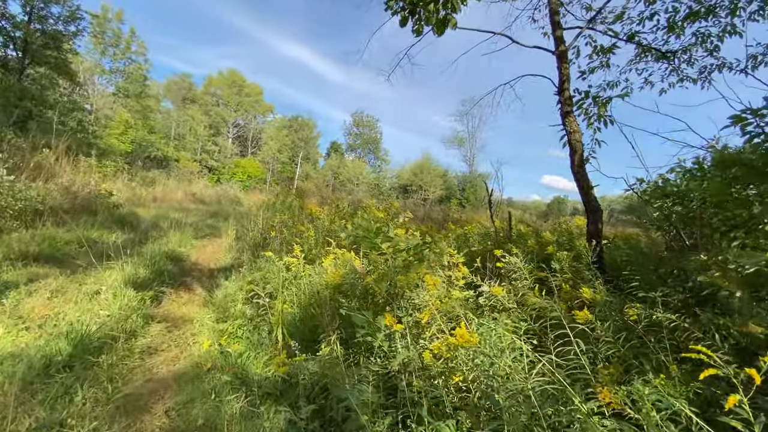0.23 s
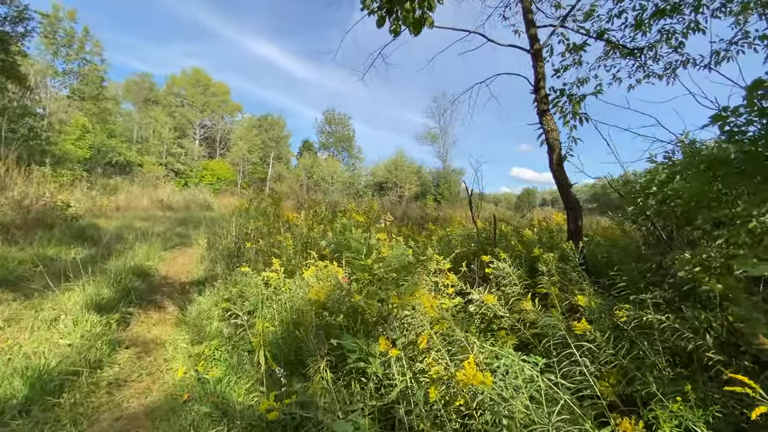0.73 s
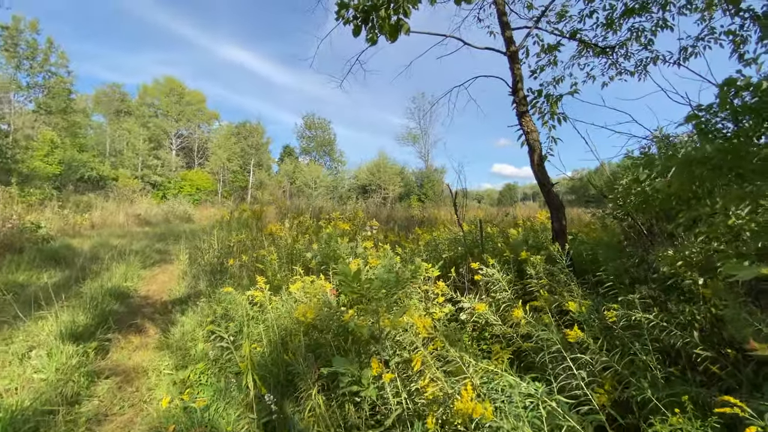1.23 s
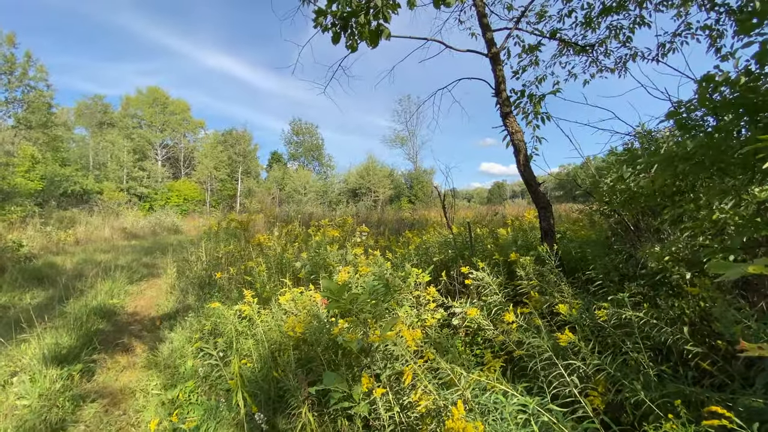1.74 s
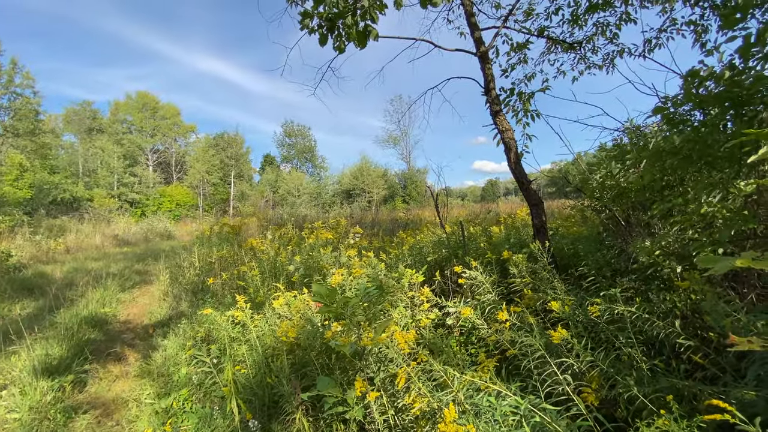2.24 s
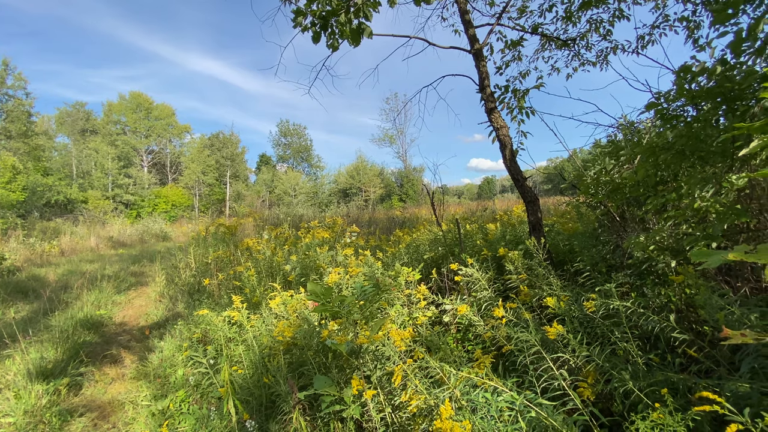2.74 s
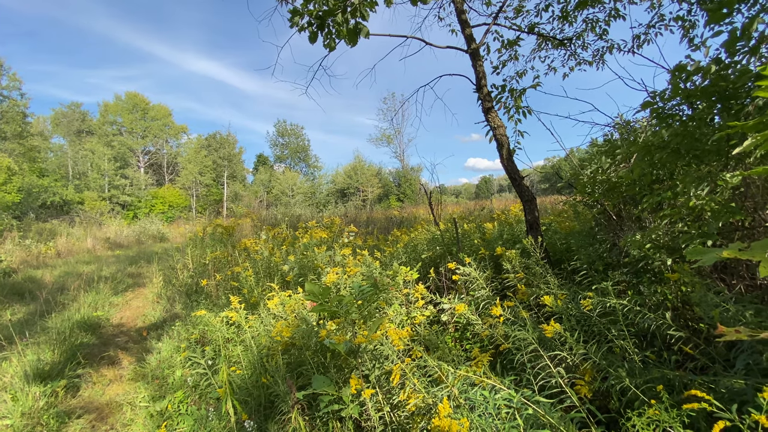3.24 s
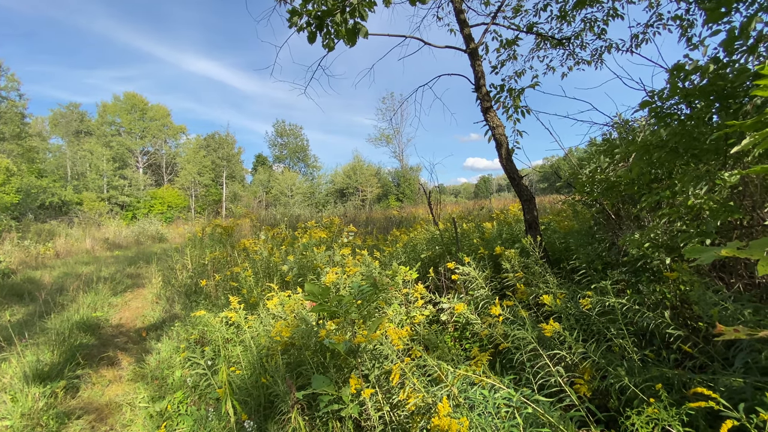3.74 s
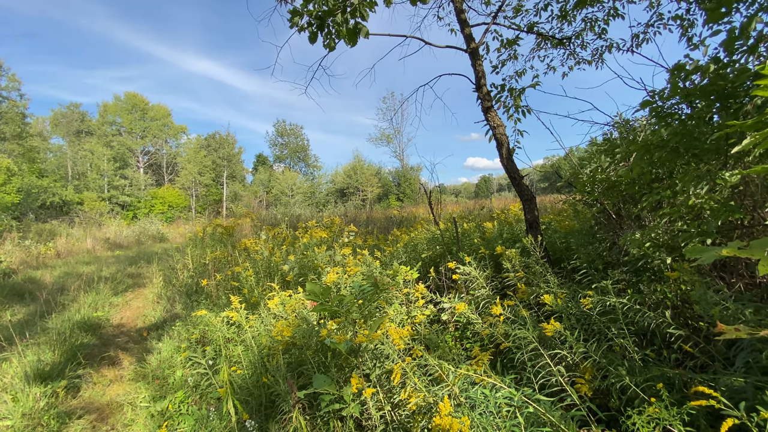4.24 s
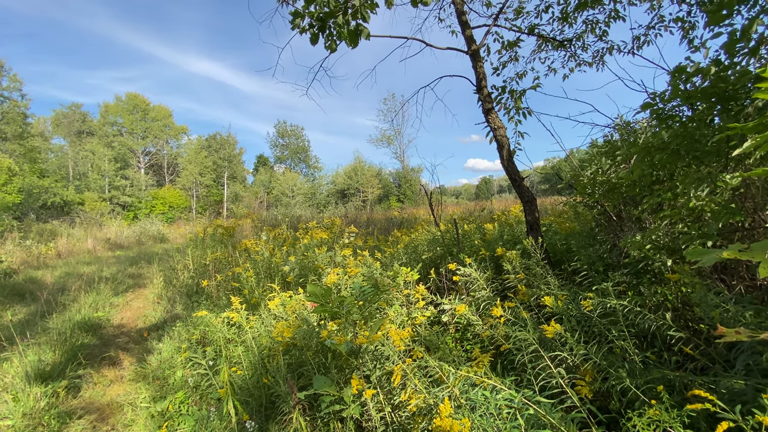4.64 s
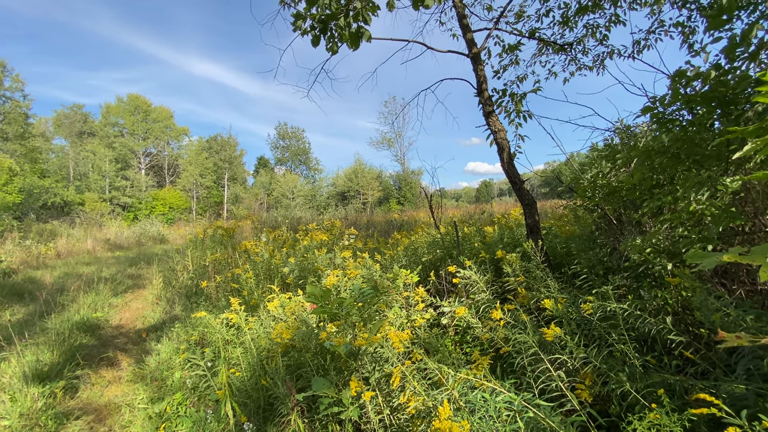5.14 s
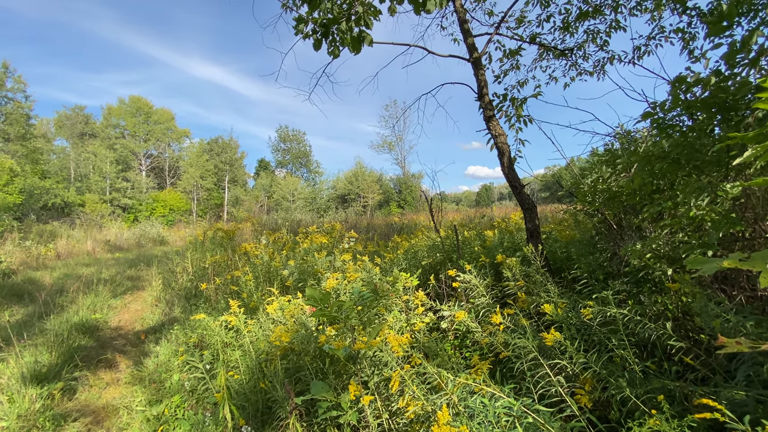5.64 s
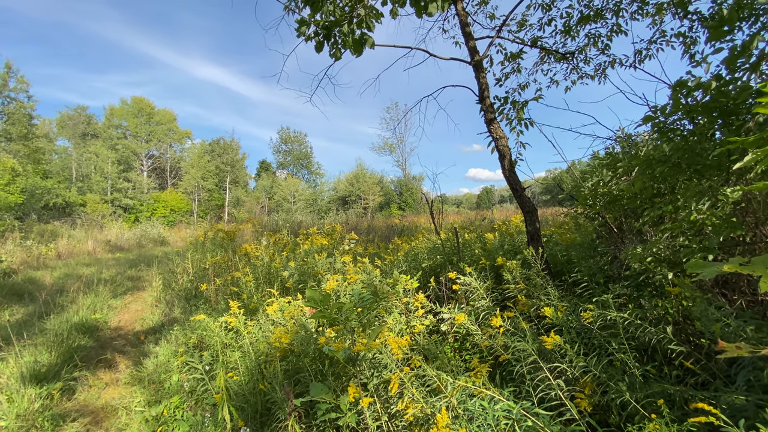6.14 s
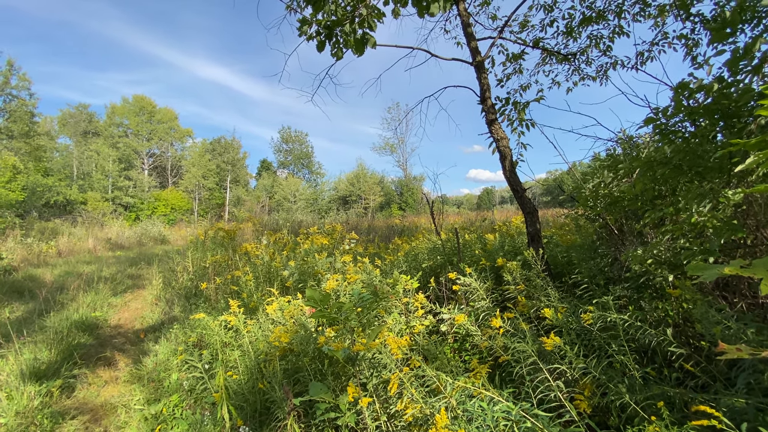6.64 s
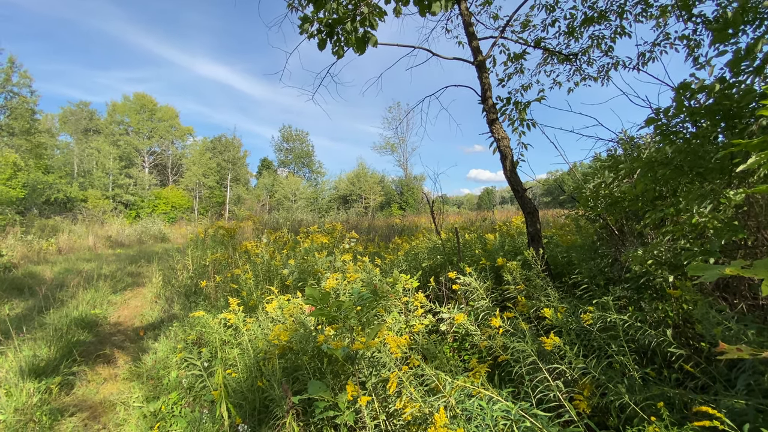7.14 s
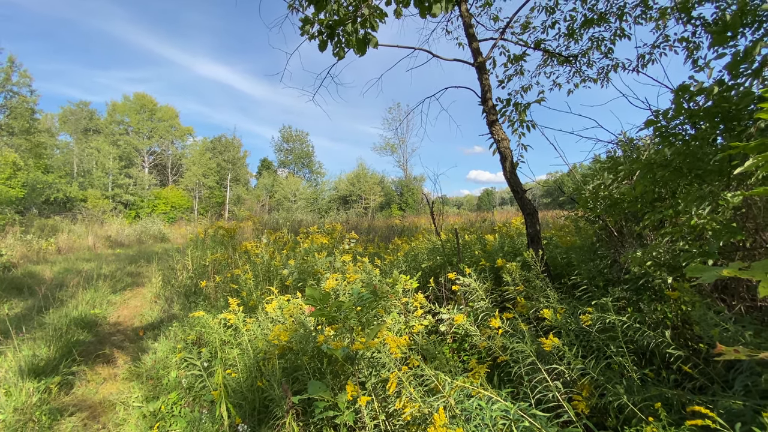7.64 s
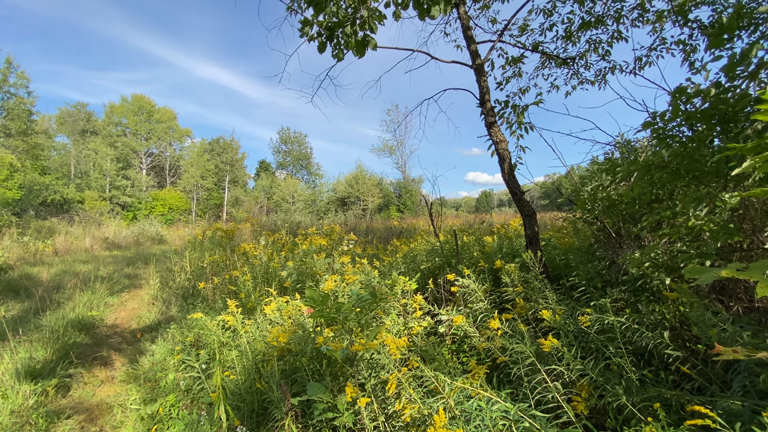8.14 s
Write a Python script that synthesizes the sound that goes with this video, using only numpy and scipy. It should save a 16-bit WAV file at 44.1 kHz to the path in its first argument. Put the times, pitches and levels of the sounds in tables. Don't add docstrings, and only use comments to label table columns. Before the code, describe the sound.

Katydids rasp about ten times a second over trilling crickets in a sunny meadow, with cloth rustle, small ticks and a soft wind rumble early on.

```python
import sys
import numpy as np
from scipy import signal
from scipy.fft import rfft, irfft
from scipy.io import wavfile
from scipy.ndimage import uniform_filter1d

SR = 44100
rng = np.random.default_rng(int(sys.argv[2]) if len(sys.argv) > 2 else 0)


def linear_from_db(decibels):
    return 10 ** (np.asarray(decibels, float) / 20)


def store_pcm(level_fs):
    pcm = np.round(np.clip(level_fs, -1, 1) * 32767).astype(np.int16)
    wavfile.write(sys.argv[1], SR, np.atleast_2d(pcm).T)


N = 369999
TIME = np.arange(N) / SR


def evened(x):
    return x / np.sqrt(np.mean(x ** 2) + 1e-20)


def read(points, hz):
    f, value = np.transpose(points)
    return np.interp(np.log(hz + 1), np.log(f + 1), value, left=-120, right=-120)


def curve(rows):
    return np.interp(TIME, *np.transpose(rows))


def sides(pan_db):
    return linear_from_db(np.array([pan_db / 2, -pan_db / 2]))


def add(mix, s, sound):
    part = mix[:, max(round(s * SR), 0):][:, :sound.shape[1]]
    part += sound[:, :part.shape[1]]


def colour(x, gains):
    return irfft(rfft(x) * gains, N)


def hiss(shape, same, patchy_db, size=1024):
    hop, hz = size // 4, np.fft.rfftfreq(size, 1 / SR)
    a, b, c, d, patches = rng.standard_normal((N // hop + 5, len(hz), 5)).T
    patches = uniform_filter1d(patches, size=8, axis=0)
    patches = evened(uniform_filter1d(patches, size=12, axis=1))
    same = np.clip(same, -1, 1)
    left = a + 1j * b
    right = same * left + np.sqrt(1 - same ** 2) * (c + 1j * d)
    z = np.array([left, right]) * linear_from_db(read(shape, hz)[:, None] + patchy_db * patches)
    return evened(signal.istft(z, nperseg=size, noverlap=size - hop)[1][:, :N])


# t/s, lateness/ms, level/dB
LEADER = [(0.0, -15, -50.2), (0.35, -13.8, -45.3), (1.1, -7, -45.5), (1.5, -9, -43), (1.75, -13.0, -44.5),
          (2.2, -5, -45), (3.0, -10, -44), (3.5, -23, -44.6), (3.9, -15, -44.5), (4.6, -13.7, -44.5),
          (5.2, -16.8, -44.6), (5.7, -13, -45), (6.2, -15.0, -45.0), (6.6, 10.9, -48.1), (7.0, -9.5, -47),
          (7.5, -18.5, -48.5), (8.0, -30.8, -51), (8.4, 20.0, -50)]
# first stroke t/s, last stroke t/s, period/ms, first level/dB, last level/dB
BOUTS = [
    (.0321, 1.041, 100.9, -43.4, -48.6),
    (1.4772, 3.588, 100.5, -56.6, -54.9),
    (3.654, 6.153, 99.95, -55.7, -52.8),
    (6.2894, 6.906, 102.8, -47.7, -50.2),
    (7.4493, 8.386, 104.0, -46.3, -45.7),
]


def wing_strokes():
    first_s, period_s = .048, .1044
    beat = np.arange(first_s, N / SR + .05, period_s)
    s, late_ms, db = np.transpose(LEADER)
    rows = list(zip(beat + np.interp(beat, s, late_ms) / 1000, np.interp(beat, s, db)))
    for first, last, period_ms, first_db, last_db in BOUTS:
        count = round((last - first) / period_ms * 1000) + 1
        times = first + np.arange(count) * period_ms / 1000
        rows += zip(times, np.linspace(first_db, last_db, count))
    return rows


def strokes(rows, shift_s, rise_s, fall_s):
    power, u = np.zeros((1, N)), np.arange(-.08, .05, 1 / SR)
    stop_sharpness = 2.8
    shape = np.exp(-np.where(u < 0, (u / rise_s) ** 2, abs(u / fall_s) ** stop_sharpness))[None]
    for s, db in rows:
        start_s = s + shift_s - .08
        missed = max(round(-start_s * SR), 0)
        add(power, start_s, linear_from_db(2 * db) * shape[:, missed:])
    return power[0]


# from t/s, to t/s
PAUSES = [
    (1.1, 1.42),
    (6.95, 7.45),
]


def murmur():
    murmur_db, pause_db, ramp_s = -59, -5.5, 0.025
    resting = sum(np.clip(np.minimum(TIME - a, b - TIME) / ramp_s, 0, 1) for a, b in PAUSES)
    return linear_from_db(2 * (murmur_db + pause_db * resting))


# f/Hz, level/dB
RASP = [(8600, -45), (9200, -17.5), (10000, -8), (11000, -1.5), (12000, -1.5), (13000, 2), (14000, -3.5),
        (15000, -6.5), (16000, -9.5), (16300, -39)]
# f/Hz, left-right level/dB
RASP_PAN = [(8500, 1.5), (9800, -4), (10800, -5.5), (11800, 0.5), (13000, -4), (16000, 7)]


def katydids():
    hz = np.fft.rfftfreq(N, 1 / SR)
    tooth_gain = linear_from_db(1.2 * np.minimum(rng.exponential(1, (3, N)), 3.0))
    struck = rng.random((3, N)) < 2000 / SR
    teeth = tooth_gain * struck * rng.choice([-1, 1], (3, N))
    rush = evened(evened(teeth) + 1.5 * rng.standard_normal((3, N)))

    rows, blur = wing_strokes(), murmur()
    late = np.sqrt(strokes(rows, shift_s=0.0085, rise_s=0.017, fall_s=0.021) + blur)
    early = np.sqrt(strokes(rows, shift_s=-0.001, rise_s=0.016, fall_s=0.017) + linear_from_db(-1.0) * blur)
    low_share = 1 / (1 + (hz / 12000) ** 12)
    sound = rfft(rush * late) * np.sqrt(low_share) + rfft(rush * early) * np.sqrt(1 - low_share)

    same = np.clip(np.interp(hz, [9500, 10200, 11000, 16000], [.05, .6, 0.86, .8]), 0, 1)
    lead = np.exp(2j * np.pi * (hz - 11150) / 4400)
    shared = np.sqrt(same) * sound[0]
    own = np.sqrt(1 - same) * sound[1:]
    ports = np.array([shared + own[0], shared * lead + own[1]])
    gain = linear_from_db(read(RASP, hz))
    pan = sides(np.interp(hz, *np.transpose(RASP_PAN)))
    return linear_from_db(-1.0) * irfft(ports * gain * pan, N) / np.sqrt(np.mean(gain ** 2))


def chirp(s, db, hz, growth_db, gap_ms, pan_db):
    first_gap_s, middle_db, rise_hz = .0445, 1.5, 35
    out, t = np.zeros((2, SR // 5)), np.arange(0, .016, 1 / SR)
    for step, at in ((-1, 0), (0, first_gap_s), (1, first_gap_s + gap_ms / 1000)):
        pitch, phase = hz + step * rise_hz, rng.random((2, 1))
        cycles = pitch * t * (1 - 0.42 * t) + phase
        pulse = signal.windows.tukey(len(t), .5) * np.sin(2 * np.pi * cycles)
        level = linear_from_db(db + step * growth_db + middle_db * (step == 0))
        add(out, at, level * sides(pan_db)[:, None] * pulse)
    return s - first_gap_s - .002, out


# middle pulse t/s, level/dB, f/Hz, growth per pulse/dB, last gap/ms
CHIRPS = [(.164, -46, 4860, 5, 44), (.9207, -44.5, 4860, -0.5, 50), (1.4544, -41, 4820, -1, 47),
          (1.888, -46.5, 4850, 2, 51), (2.4279, -48, 4800, 3, 52), (2.9317, -45, 4830, 0, 44),
          (3.412, -46.5, 4800, 4, 51), (3.7594, -46, 4850, -1, 55), (4.2153, -48.5, 4810, .4, 47),
          (4.6683, -45.5, 4870, 3.5, 52), (5.0674, -45.5, 4870, 4, 49), (5.4779, -46, 4890, 2.5, 52),
          (5.9469, -47.5, 4830, 4, 48), (6.4812, -46, 4800, 0.3, 48), (6.9443, -47, 4850, 4, 48),
          (7.425, -44.5, 4850, 1, 49), (7.9758, -45.5, 4854, 0.5, 58)]
# middle pulse t/s, level/dB
ANSWERS = [(.041, -52), (.505, -56.5), (1.055, -57), (1.496, -53.5), (2.015, -55), (2.468, -52.5),
           (2.917, -54), (3.454, -56), (3.85, -54), (4.399, -53.5), (4.843, -52), (5.294, -50),
           (5.836, -50), (6.262, -50), (6.696, -52.5), (7.153, -51), (7.634, -53), (8.076, -52)]


def field_crickets():
    out = np.zeros((2, N))
    for s, db, hz, growth_db, gap_ms in CHIRPS:
        add(out, *chirp(s, db + 1.4, hz, growth_db, gap_ms, pan_db=6.0))
    for s, db in ANSWERS:
        add(out, *chirp(s, db + 1.5, hz=5114, growth_db=0.3, gap_ms=47.5, pan_db=3.0))
    return out


def trill(hz, db, pan_db, share, rate, lead, glide=0.033, uneven_db=0.4, slip=.3):
    turns = rate * TIME + lead + .5
    count = np.floor(turns).astype(int) + 2
    step, loud = rng.standard_normal((700, 2, 2)).T
    phase = np.cumsum(slip * step, axis=1) + rng.random((2, 1))
    u = np.clip((turns % 1 - .5) / share, -.5, .5)
    cycles = hz * (TIME - glide * u ** 2 / 2 * share / rate) + phase[:, count]
    envelope = np.cos(np.pi * u) ** 2 * linear_from_db(uneven_db * loud[:, count])
    return linear_from_db(db) * sides(pan_db)[:, None] * evened(envelope * np.sin(2 * np.pi * cycles))


# wing f/Hz, level/dB, left-right level/dB, sounding share 0-1
TRILLS = [(3250, -72, 4.5, .5), (3500, -63, -4, 0.65), (3672, -65, 0.5, .6), (6674, -69, 4, 0.6),
          (7240, -69, 2, 0.7), (8207, -69.5, 1, 0.9), (5884, -72.5, -1.5, 0.75), (7640, -76, 3, 0.1),
          (7940, -74.5, 0.5, 0.5), (4895, -63, -3, 0.8), (4320, -70, -1.5, .6), (3955, -69.5, 10, 0.5)]
# pulse rate/Hz, lead/turns
BEATS = [(40.0, .14), (42.18, .45), (46.68, -.55), (41.36, .03), (49.02, .48), (54.0, -.55), (32.32, .1),
         (18.13, .45), (14.15, .05), (61.82, .33), (66.0, .2), (58.9, .1)]
# t/s, lead/turns
TREE_DRIFT = [(0, -0.15), (1.25, 0.21), (2.75, 0.43), (3.25, 0.26), (4.5, 0.15), (6, 0.15), (8.4, 0.37)]


def trillers():
    nearest = trill(3355, -62.0, 12.7, 0.61, rate=40.86, lead=curve(TREE_DRIFT), slip=0.2988)
    steady = sum(trill(*voice, *beat) for voice, beat in zip(TRILLS, BEATS))

    swell_db = np.max([db - 70 * abs(TIME - s - .03) for s, db in ANSWERS], axis=0) - 4
    voices = ((4984, 21.0, -0.7), (5085, 23.0, -5.0), (5170, 18.5, -7.5))  # f/Hz, pulse rate/Hz, level/dB
    further = sum(trill(hz, swell_db + db, 3, 0.47, rate, 0.19, slip=0.49, uneven_db=3.0)
                  for hz, rate, db in voices)

    fade_s = 0.7
    passed = np.exp(-TIME / fade_s) * trill(6790, -60, 3.8, 0.43, *BEATS[3])
    return nearest + further + steady + passed


def grass(x, t60_s, wet_db):
    t = np.arange(6000) / SR
    tail = rng.standard_normal((2, len(t))) * linear_from_db(-60 * t / t60_s) * (t > .002)
    return x + linear_from_db(wet_db) * signal.fftconvolve(x, tail / np.linalg.norm(tail[0]), axes=1)[:, :N]


# f/Hz, level/(dB per Hz)
CROWD = [(2950, -57), (3050, -33), (3150, -12.5), (3300, -4.5), (3550, -5), (4140, -11.5), (4800, -2),
         (5250, -5), (5650, -11.5), (6200, -16), (6650, -10.5), (8250, -14), (8450, -29), (8700, -50)]
# f/Hz, left-right level/dB
CROWD_PAN = [(3000, 1.5), (4100, 1), (5000, 8.5), (5600, 5.5), (7000, 8.5), (8000, 5), (9000, 4)]


def crowd():
    hz = np.fft.rfftfreq(N, 1 / SR)
    shimmer = hiss(CROWD, same=0.033, patchy_db=1.0, size=512)
    return linear_from_db(-53.5) * colour(shimmer, sides(np.interp(hz, *np.transpose(CROWD_PAN))))


# f/Hz, level/(dB per Hz)
FAR_RASP = [(8700, -42), (8950, -5.5), (9300, -1.5), (9800, -1), (10400, -6.5), (11200, -33)]


def far_katydids():
    return linear_from_db(-68.5) * sides(-1.6)[:, None] * hiss(FAR_RASP, same=0.16, patchy_db=2.5, size=512)


# t/s, peak level/dB, f/Hz, overtone f/Hz, left-right level/dB
TICKS = [(0.054, -43, 607, 1790, -2), (0.303, -54, 1630, 2170, -10), (0.348, -50.5, 910, 1850, -6),
         (0.46, -65, 1190, 1760, 1.0), (0.819, -58, 624, 1820, -3.0), (0.892, -62, 638, 1790, -5),
         (0.929, -61, 1040, 2750, -6), (1.004, -49, 1330, 2050, -9), (1.167, -51, 1020, 1850, 5),
         (1.212, -60, 640, 2620, 3), (1.268, -73, 638, 2570, 0.0), (6.192, -69, 705, 2750, 3),
         (7.726, -61, 700, 2060, -2.5), (8.364, -62, 910, 1910, 18)]


def ticks():
    out, t = np.zeros((2, N)), np.arange(0, .02, 1 / SR)
    for s, db, hz, overtone_hz, pan_db in TICKS:
        ring = np.sin(2 * np.pi * hz * t) + 0.45 * np.sin(2 * np.pi * overtone_hz * t)
        decay = linear_from_db(db + 1.5 - 60 * t / 0.012)
        add(out, s, decay * sides(pan_db)[:, None] * ring * np.minimum(t / .001, 1))
    return out


# t/s, level/dB
CLOTH = [
    [(0.0, -63.5), (0.188, -71), (0.326, -68), (0.456, -73.5), (1.178, -79), (1.45, -88.5)],
    [(7.6, -88), (8.354, -85), (8.378, -65.5), (8.39, -79)],
]
# f/Hz, level/(dB per Hz)
CLOTH_TONE = [(240, -26), (400, -1.5), (847, -7.5), (1060, -3), (2230, -12.5), (2850, -12), (3000, -15),
              (3900, -54), (6600, -120)]


def cloth():
    return linear_from_db(curve(np.vstack(CLOTH)) + 2.0) * hiss(CLOTH_TONE, same=0.16, patchy_db=3.0, size=256)


# t/s, level/dB
GUST = [(0, -71), (.2, -70.5), (.4, -60.5), (.82, -56.5), (1.0, -62.5), (1.2, -73), (1.5, -72),
        (3.5, -70.5), (3.92, -74.5), (4.66, -73.5), (5.05, -68), (5.42, -78), (5.85, -68), (6.14, -65.5),
        (6.5, -67), (6.88, -63), (7.2, -69), (8.39, -73)]
# f/Hz, level/(dB per Hz)
RUMBLE = [(15, -49), (25, -28), (40, -11), (55, -4.5), (75, 0.5), (114, -6), (150, -10.5), (200, -17),
          (260, -43)]
# f/Hz, level/(dB per Hz)
FLUTTER = [(120, -26.5), (170, -6.5), (260, -1), (340, -6), (420, -17.5), (600, -29)]


def breeze():
    gust_db = curve(GUST)
    settling_s, settling_span_s, calming_db_per_s = .85, .6, 0.37
    hands_db = 3.5 * np.exp(-((TIME - settling_s) / settling_span_s) ** 2)
    rumble_db = -61.5 + 0.27 * (gust_db + 71.5) + hands_db - calming_db_per_s * TIME
    rumble = linear_from_db(rumble_db) * hiss(RUMBLE, same=0.84, patchy_db=3.0, size=4096)
    flutter = linear_from_db(gust_db - 0.54) * hiss(FLUTTER, same=0.74, patchy_db=2.5, size=2048)
    return sides(-4.0)[:, None] * (rumble + flutter)


# f/Hz, level/(dB per Hz)
RUSTLE = [(180, -42), (300, -8.5), (545, -17.5), (674, -14.5), (749, -18), (1890, -25.5), (2500, -23.5),
          (2910, -10.5), (3000, -24), (3900, -70), (6600, -120)]


def leaves():
    return linear_from_db(-78.5) * hiss(RUSTLE, same=0.023, patchy_db=0.0, size=512)


def scene():
    crickets = grass(field_crickets() + trillers(), t60_s=0.084, wet_db=-7.5)
    singers = katydids() + crickets + crowd() + far_katydids()
    return singers + ticks() + cloth() + breeze() + leaves()


def roll_off(x):
    return signal.sosfilt(signal.butter(12, 15780, fs=SR, output="sos"), x)


# f/Hz, level/dB
MID_KEPT = [(12650, 0), (12770, -15), (13080, -15.5), (13150, -12.5), (13750, -11.5), (13900, -9),
            (14500, 1.5)]
# f/Hz, level/dB
SIDE_KEPT = [(10700, 0), (10900, -6.5), (11450, -4.5), (11700, -3.5), (14950, 2), (15150, -6.5)]


def record(dry):
    hz = np.fft.rfftfreq(N, 1 / SR)
    mid = colour(dry.mean(0), linear_from_db(np.interp(hz, *np.transpose(MID_KEPT))))
    side = colour((dry[0] - dry[1]) / 2, linear_from_db(np.interp(hz, *np.transpose(SIDE_KEPT))))
    return roll_off(np.array([mid + side, mid - side]))


dry = scene()
out = record(dry)
store_pcm(out)
```